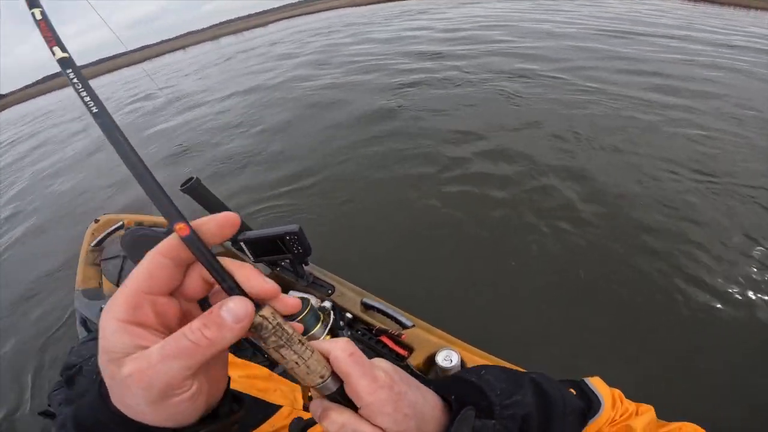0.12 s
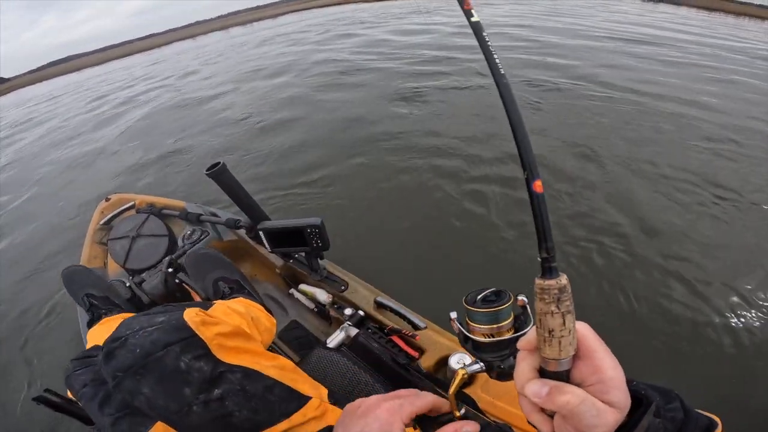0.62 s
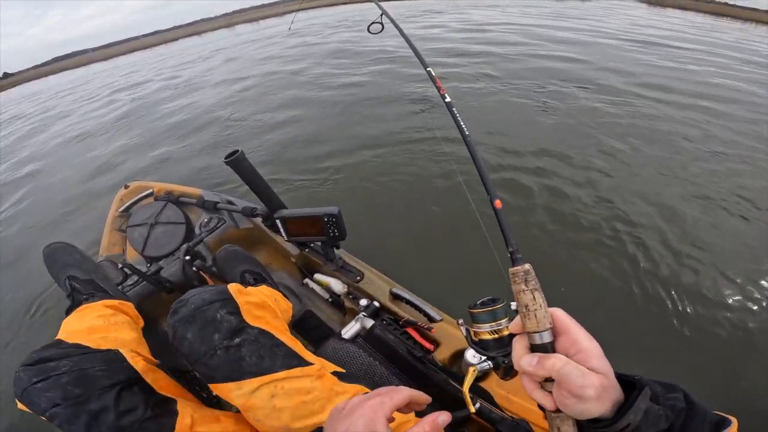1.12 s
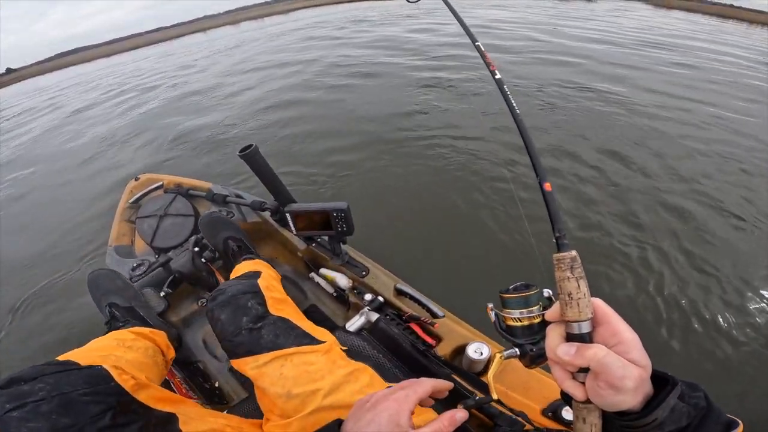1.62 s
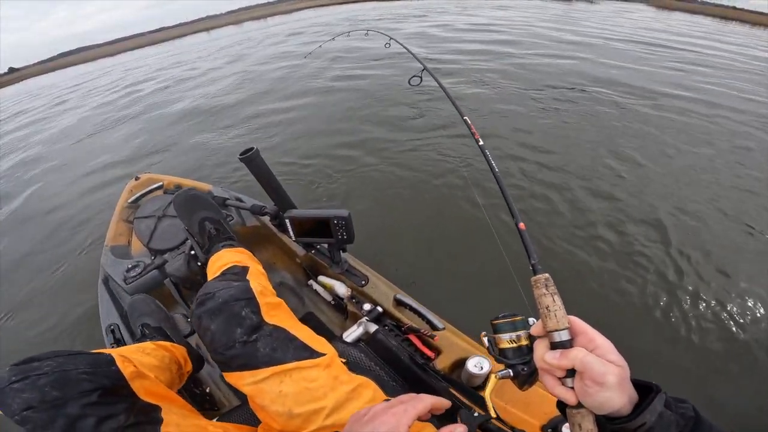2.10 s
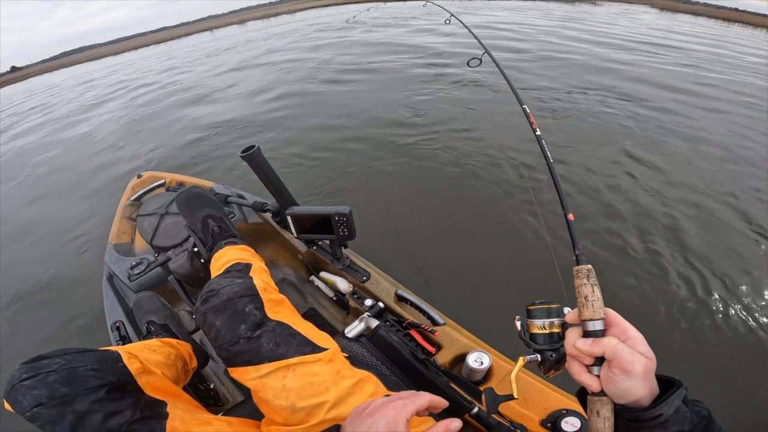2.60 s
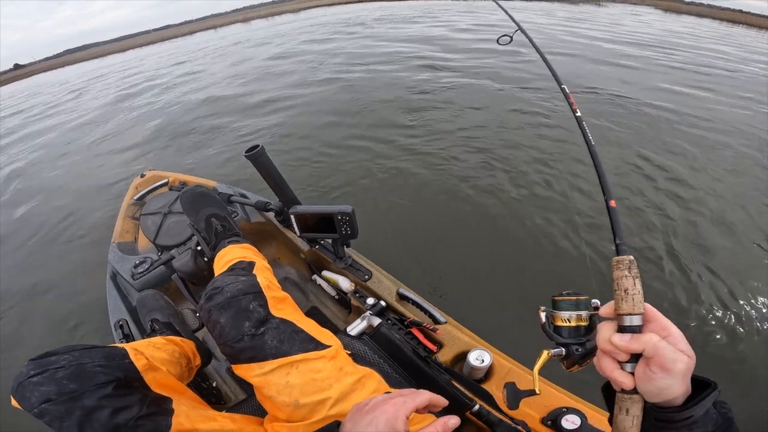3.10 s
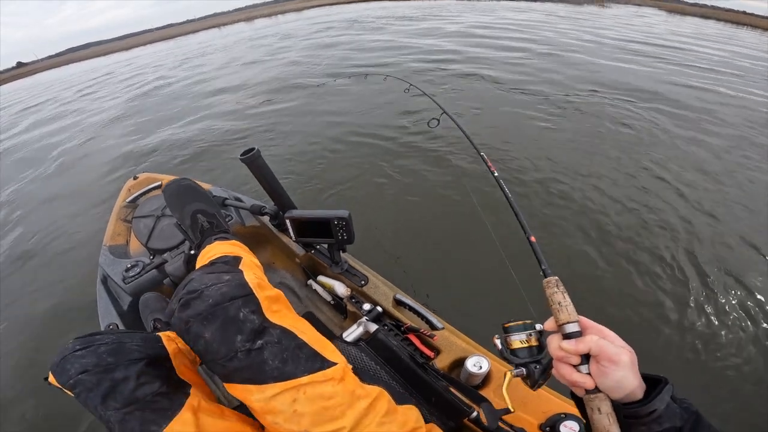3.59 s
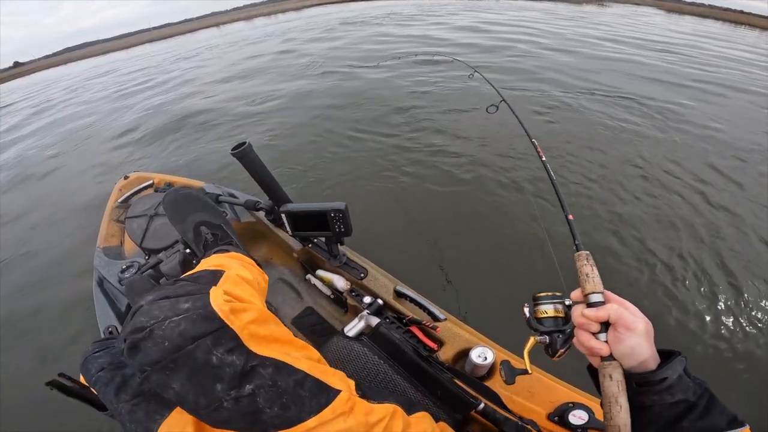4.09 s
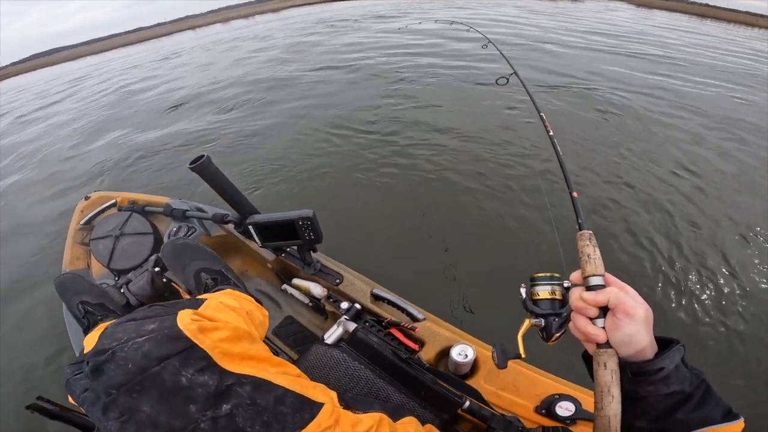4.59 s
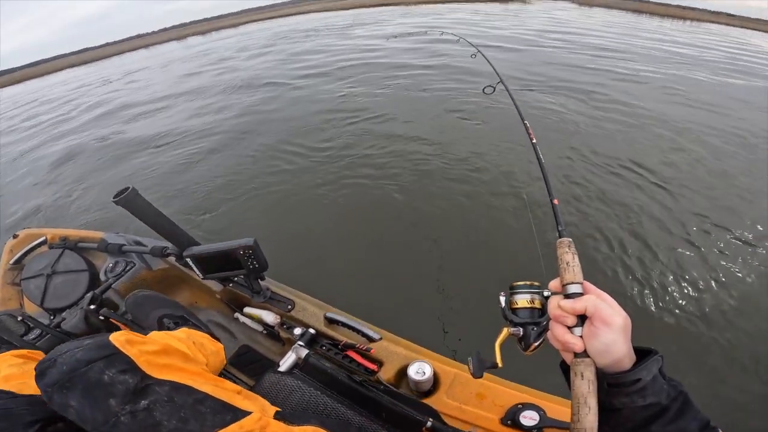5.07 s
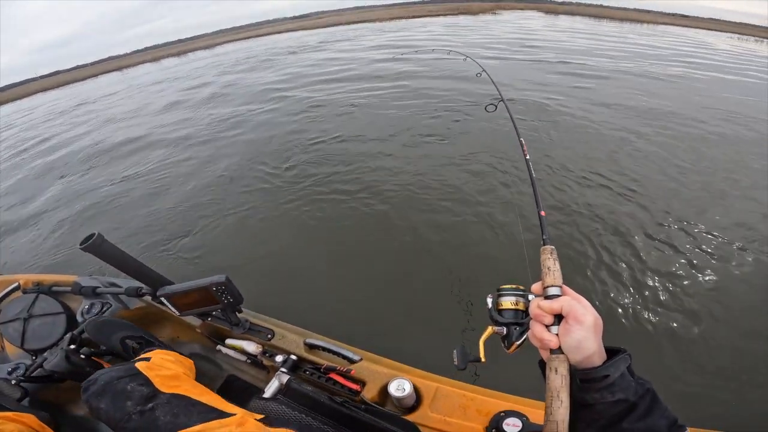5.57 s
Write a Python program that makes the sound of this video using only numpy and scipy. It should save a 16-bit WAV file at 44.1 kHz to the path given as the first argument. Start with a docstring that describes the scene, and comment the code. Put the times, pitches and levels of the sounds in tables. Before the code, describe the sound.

Open air on a kayak, heard from a body-worn microphone with no echo. Low, wavering wind rumble and dull handling bumps continue throughout. At 0-0.5 s, several quick knocks and sleeve scuffs accompany the first two sharp reel ticks. From 0.7 s the drag clicks about ten times a second, each a tiny bright metallic snap, easing near 1.5 s, while stiff cloth rustles and gear thuds on the hull. Around 1.85-2.2 s the ticks race at nearly thirty a second with faint line hiss, then slow and stop by 2.65 s. Cloth goes quiet near 3 s, then rustles again at 3.2 s. A second run of ticks, 3.4-4.2 s, peaks around 3.65 s and slows; one lone tick follows at 4.65 s amid a barely audible airy whine. Clustered knocks come at 4.8-5 s, a short falling rubbery squeak at 5.2 s, more rustling, and a strong thud at 5.65 s.

```python
"""In a kayak, on a body-worn camera: a spinning reel's drag clicks an arm's length away as a fish pulls line.
A spring pawl ticks on the spool, ringing body and rim; rod and gear knock the hull as damped tones.
A stiff suit scuffs, crumples and hisses, and wind rumbles on the microphone, all in shaped noise; bumps come
through the mount. Fast line hisses in the guides, a faint whine comes and goes, and late on one rub squeaks.
The two microphone ports share nearly everything and differ mostly in the treble."""
import sys
import numpy as np
from scipy import signal
from scipy.fft import rfft, irfft, next_fast_len
from scipy.io import wavfile
from scipy.ndimage import uniform_filter1d

SR = 44100
rng = np.random.default_rng(int(sys.argv[2]) if len(sys.argv) > 2 else 0)


def natural_amplitude(level_db):
    """Convert a level in decibels to a linear amplitude factor, elementwise."""
    exponent = np.asarray(level_db, float) / 20
    return 10 ** exponent


def pcm_store(signal):
    """Save signal as 16-bit PCM."""
    levels = np.round(np.clip(np.atleast_2d(signal), -1, 1) * 32767)
    wavfile.write(sys.argv[1], SR, levels.astype(np.int16).T)


N = 251092  # samples

# Levels in the tables are relative dB; later stages add to them.
# Wind on the microphone. Each row: frequency in Hz, density in dB.
WIND_SPECTRUM = [(12, -5), (22, 5.5), (55, -3.5), (100, -7), (140, -21), (250, -77)]
# Swells of the wind rumble, some only its random wavering.
# Each row: middle in seconds, length in seconds, peak in dB.
RUMBLE_SWELLS = [(0.06, .08, -30), (0.17, 0.37, -35.5), (0.3, 0.14, -23), (0.6, 0.16, -42),
                 (1.17, 0.35, -37), (1.31, 0.2, -35), (1.68, .1, -42), (2.55, 0.094, -41),
                 (2.7, 0.17, -38.5), (2.99, 0.22, -33.5), (3.15, 0.13, -39), (3.25, 0.049, -44),
                 (3.54, .16, -37.5), (3.78, .11, -28), (3.9, 0.2, -41), (4.25, 0.12, -39), (4.4, 0.21, -38),
                 (4.66, 0.061, -36), (4.91, 0.053, -45), (5.42, 0.33, -40), (5.68, 0.14, -30)]
# How hard the body works against the camera mount. Each row: time in seconds, bump level in dB.
STRAIN = [(0.0, -38.5), (0.3, -34.5), (0.45, -45), (0.84, -39), (1.15, -39), (1.45, -40.5), (1.8, -40.5),
          (2.1, -44.5), (2.42, -43.5), (2.55, -51), (3.2, -49), (3.35, -45.5), (4.1, -44.5), (4.75, -43.5),
          (5.1, -40.5), (5.45, -38), (5.69, -41.5)]
# Dull bumps through the mount. Each row: frequency in Hz, density in dB.
BUMP_SPECTRUM = [(70, -6), (120, -2), (200, -0.5), (300, -9), (450, -18), (800, -68)]
# Jolts through the mount. Each row: middle in seconds, length in seconds, peak in dB.
JOLTS = [(0.08, 0.096, -36.5), (2.68, 0.046, -55.5), (2.97, 0.088, -48), (3.5, 0.11, -55),
         (3.79, 0.068, -43.5), (4.17, 0.033, -34.5), (4.82, 0.083, -44), (4.94, 0.19, -30.5),
         (5.26, 0.12, -49), (5.65, 0.093, -43)]
# How briskly the suit moves. Each row: time in seconds, fabric hiss in dB.
RUSTLE = [(0.0, -61.5), (0.17, -59), (0.4, -56.5), (0.6, -65), (0.84, -60), (1.1, -57.5), (1.45, -56.5),
          (1.56, -62), (1.7, -71), (1.95, -62), (2.25, -67), (2.43, -67), (2.52, -82.5), (2.85, -87),
          (3.14, -81), (3.22, -58), (3.4, -57), (3.55, -58.5), (3.7, -59.5), (3.9, -61), (4.2, -62.5),
          (4.4, -66.5), (4.52, -74.5), (4.8, -68), (5.02, -63), (5.45, -60), (5.69, -57)]
# Single rubs of sleeve on suit. Each row: middle in seconds, length in seconds, scuff in dB, hiss in dB.
RUBS = [(0.083, 0.068, -37.5, -73), (0.361, 0.074, -46, -61), (0.479, 0.14, -44.5, -46),
        (1.306, 0.096, -54, -86), (1.562, 0.029, -50, -78), (2.4, 0.053, -50, -89),
        (3.246, 0.064, -54, -49), (3.58, 0.06, -54, -65), (3.89, 0.05, -57, -75),
        (4.162, 0.032, -45.5, -59), (4.33, .1, -67, -94), (4.835, 0.063, -47, -76),
        (4.933, 0.11, -42.5, -57.5), (5.33, 0.23, -48.5, -88)]
# Low scuffing of the suit. Each row: frequency in Hz, density in dB.
SCUFF_SPECTRUM = [(200, -20.5), (380, 0.5), (700, -6), (1100, -13), (1350, -16), (1600, -25), (2500, -61)]
# Fabric hiss close to the microphone. Each row: frequency in Hz, density in dB.
FABRIC_SPECTRUM = [(530, -20), (900, 0), (1220, -4), (1670, -7), (2550, -10), (3140, -9.5), (4100, -15),
                   (7080, -17.5), (8910, -33), (10800, -37.5), (12700, -25), (15200, -43), (16400, -37)]
# A sleeve dragging. Each row: frequency in Hz, density in dB.
DRAG_SPECTRUM = [(600, -23), (1200, -11), (2200, 1.5), (3500, 2), (4800, -9), (7200, -8), (9000, -24),
                 (10800, -32), (12500, -15), (15200, -36), (16400, -45)]
# Hiss that differs between the ports. Each row: frequency in Hz, density in dB.
SIDE_SPECTRUM = [(1000, -18), (4000, -22.5), (8000, -21), (10300, -56), (11200, -17), (12300, -4.5),
                 (13500, -22), (15200, -11), (16000, -45)]
# Microphone hiss. Each row: frequency in Hz, density in dB.
MIC_HISS_SPECTRUM = [(590, -25), (1000, 8), (1340, 6), (1950, 6), (3930, -5), (7380, 22), (8700, -109),
                     (11400, -127), (12300, -98), (16400, -35)]
# Rod and gear on the hull. Each row: start in seconds, thud in dB, pitch in Hz, hard edge in dB.
KNOCKS = [(0.015, -22.5, 390, -54), (0.06, -25, 1115, -48), (0.073, -33, 456, -46),
          (0.089, -27, 520, -49.5), (0.299, -22, 504, -59), (0.668, -21.5, 440, -59),
          (1.227, -20, 410, -52), (1.343, -24, 474, -66), (1.492, -25, 436, -60), (1.562, -27, 406, -60),
          (2.043, -36, 547, -43), (2.346, -27.5, 900, -60), (2.394, -44, 464, -45.5),
          (3.455, -19.5, 680, -57), (3.49, -28, 840, -58), (3.515, -27, 435, -57), (3.901, -27, 410, -63),
          (4.118, -23.5, 396, -65), (4.362, -24.5, 494, -64), (4.835, -23.5, 430, -52.5),
          (4.849, -31, 990, -57), (4.898, -19, 390, -52), (4.931, -35, 382, -47), (4.967, -16.5, 407, -60),
          (5.288, -20, 354, -60), (5.364, -28, 400, -60), (5.486, -26.5, 535, -58), (5.653, -11, 437, -43)]
# Pawl ticks. Each row: start in seconds (before TICK_LAG_S), strike in dB, spool shimmer in dB,
# shimmer across the ports in dB.
TICKS = [(0.138, -28.5, -37.5, -35), (0.348, -29.5, -45.5, -33), (0.7288, -27.5, -48, -36),
         (0.855, -30, -49, -34), (0.9442, -30.5, -47, -33), (1.0251, -32.5, -37.5, -29),
         (1.1, -37, -47, -26), (1.179, -35, -45, -31), (1.254, -31.5, -47, -34), (1.3486, -29, -59, -28),
         (1.46, -27.5, -66, -33), (1.6212, -27, -53.5, -33), (1.766, -30.5, -66, -40),
         (1.8303, -31, -54, -38), (1.878, -34.5, -43, -33), (1.9175, -41, -40.5, -29),
         (1.954, -33, -49, -33), (1.9872, -29.5, -41, -33), (2.0203, -28, -43, -28),
         (2.053, -26.5, -45, -29), (2.0875, -29.5, -44, -35), (2.1255, -27.5, -47, -35),
         (2.169, -28, -44, -38), (2.2238, -28, -45, -33), (2.3047, -28, -56, -33), (2.431, -30, -60, -39),
         (2.6521, -31, -64, -39), (3.375, -31.5, -60, -37), (3.5035, -28.5, -48, -33),
         (3.5775, -31, -53, -33), (3.6186, -31, -49, -39), (3.6546, -31.5, -45.5, -41),
         (3.6893, -35, -52, -35), (3.728, -36, -48, -33), (3.772, -32, -45, -38), (3.8193, -28, -60, -36),
         (3.8674, -31.5, -48, -32), (3.93, -27.5, -49, -33), (4.0237, -27.5, -52, -36),
         (4.168, -28, -49, -37), (4.648, -30.5, -48, -33)]
# Reel body under the pawl. Each row: nominal frequency in Hz, level in dB, 60 dB decay in seconds.
BODY_MODES = [(5050, -24, .004), (5560, -2, .007), (5920, -2, .007), (5720, -15, .02), (6500, -13, .006),
              (7200, -17, .006), (8400, -15, .007), (9750, -25, .006), (3410, -37, .18), (7575, -42, .28)]
# Thin spool rim. Each row: nominal frequency in Hz, level in dB, 60 dB decay in seconds.
RIM_MODES = [(11950, -5, .016), (12180, -2, .02), (12450, -8, .012), (14400, -2, .004), (15000, -7, .003)]
# What reaches the ports out of step. Each row: nominal frequency in Hz, level in dB, 60 dB decay in seconds.
PORT_MODES = [(12270, 9, 0.0063), (12300, -8, 0.011), (13400, -18, .006), (14800, -4, 0.0043),
              (15400, -18, .004)]
# Line hissing through the guides during fast runs. Each row: middle in seconds, length in seconds,
# peak in dB, centre in Hz, width of each filter pass in Hz.
LINE_RUNS = [(1.96, 0.57, -65, 8000, 1200), (2.05, 0.63, -75.5, 10500, 900), (3.71, 0.53, -69, 9800, 840)]
# A faint airy whine. Each row: middle in seconds, length in seconds, peak in dB.
WHINE_RUNS = [(2.38, 0.62, -65), (4.63, 0.54, -62.5)]
# A short rubbing squeak. Each row: time in seconds, nominal pitch in Hz, level in dB,
# overtones over the fundamental in dB.
SQUEAK = [(5.135, 1400, -70, -30), (5.15, 1405, -50, -30), (5.195, 1378, -43, -20), (5.21, 1346, -42, -8),
          (5.227, 1290, -45, -7), (5.24, 1130, -54, 4), (5.256, 1085, -46, -14), (5.275, 1050, -70, -20)]

# Middle settings of rustle and strain [dB]; the levels below move by so many dB per dB away from them
MID_RUSTLE_DB, MID_STRAIN_DB = -62, -43
WIND_DB, WIND_PER_STRAIN = -40, 0.088
SCUFF_DB, SCUFF_PER_RUSTLE, SCUFF_PER_STRAIN = -52.5, 0.35, 0.15
CRUMPLE_DB, CRUMPLE_PER_RUSTLE = -57.5, 1
# Folds of stiff cloth popping over: pops a second, pitch range [Hz], twice the cycles to the peak, size spread
# [dB]
CRUMPLE_PER_S, CRUMPLE_LOW_HZ, CRUMPLE_HIGH_HZ, CRUMPLE_CYCLES = 260, 450, 1700, 2.2
CRUMPLE_SPREAD_DB = 3
FABRIC_SIDE_DB = -25  # side against mid
KNOCK_T60_S, CRACK_S = 0.014, .0045  # thud's 60 dB decay, crack's time constant
TICK_LAG_S = .0008  # fixed delay added to every tick start
BODY_RISE_S, SNAP_S = .0011, .0012  # build-up of the body ring, time constant of the snap
TOP_HZ = 15300  # treble limit of the camera


def curve(table):
    """Columns of a table joined by straight lines in time."""
    s, *columns = np.transpose(table)
    return [np.interp(np.arange(N) / SR, s, c) for c in columns]


def colour(x, spectrum):
    """Shape a signal by (Hz, dB) points joined over log frequency; rms 1."""
    hz, db = np.transpose(spectrum)
    size = next_fast_len(N)
    f = np.maximum(np.arange(size // 2 + 1) * SR / size, 1)
    gain = natural_amplitude(np.interp(np.log(f), np.log(hz), db))
    y = irfft(rfft(x, size) * gain, size)[:N]
    return y / np.std(y)


def walk(rate):
    """Random levels held 1 / rate s and slewed twice."""
    k = int(SR / rate)
    held = np.repeat(rng.standard_normal(N // k + 1), k)
    return uniform_filter1d(uniform_filter1d(held, k), k)[:N]


def grainy(rate, spread_db, share):
    """Noise mixed with scattered clicks of unequal size, about rate a second."""
    present = rng.random(N) < rate / SR
    sizes = natural_amplitude(spread_db * rng.standard_normal(N))
    clicks = present * rng.choice([-1, 1], N) * sizes
    return rng.standard_normal(N) + share * clicks / np.std(clicks)


def swells(events):
    """Gain of (middle, length, peak dB) events, each a squared-cosine rise and fall."""
    t = np.arange(N) / SR
    return sum(natural_amplitude(db) * np.cos(np.pi * np.clip((t - s) / length, -.5, .5)) ** 2 for s, length, db in events)


def add(out, s, x):
    """Mix a sound in at a time."""
    i = int(s * SR)
    out[i:i + len(x)] += x[:N - i]


def wind(tense):
    """Low wind rumble on the microphone, wavering and rising a little with strain, plus placed swells."""
    blow = natural_amplitude(WIND_DB + WIND_PER_STRAIN * tense + 2.2 * walk(9)) + swells(RUMBLE_SWELLS)
    return blow * colour(rng.standard_normal(N), WIND_SPECTRUM)


def mount_bumps(strain_db):
    """Dull grainy noise carried through the mount as the body strains, with single jolts."""
    push = (natural_amplitude(strain_db) + swells(JOLTS)) * natural_amplitude(0.78 * walk(25))
    return push * colour(grainy(60, 4.8, 0.54), BUMP_SPECTRUM)


def crumple():
    """Stiff folds popping over: scattered bursts of a few cycles, each with its own pitch and size; rms 1."""
    out, t = np.zeros(N), np.arange(SR // 50) / SR
    for when, pitch, size in rng.random((int(CRUMPLE_PER_S * N / SR), 3)):
        hz = CRUMPLE_LOW_HZ * (CRUMPLE_HIGH_HZ / CRUMPLE_LOW_HZ) ** pitch
        turn = t * hz / CRUMPLE_CYCLES
        gain = natural_amplitude(-CRUMPLE_SPREAD_DB * np.log(1 - size))
        add(out, when * N / SR, gain * turn * np.exp(-2 * turn) * np.sin(2 * np.pi * hz * t))
    return out / np.std(out)


def suit_scuff(brisk, tense):
    """Cloth rubbing on cloth: low grainy noise, with the crumpling of its folds."""
    rub = natural_amplitude(SCUFF_DB + SCUFF_PER_RUSTLE * brisk + SCUFF_PER_STRAIN * tense)
    rub = rub + swells((s, length, db) for s, length, db, _ in RUBS)
    scuff = rub * natural_amplitude(2.0 * walk(40)) * colour(grainy(250, 5.4, 0.7), SCUFF_SPECTRUM)
    fold_gain = natural_amplitude(CRUMPLE_DB + CRUMPLE_PER_RUSTLE * brisk + 4.9 * walk(9.2))
    return scuff + fold_gain * crumple()


def suit_hiss(rustle_db):
    """Fine friction of the fabric and dragging sleeve, as grainy treble noise. Gives mid, side."""
    hiss = natural_amplitude(rustle_db + 6.0 + 2.65 * walk(13))
    drag = swells((s, length, db) for s, length, _, db in RUBS)
    mid = hiss * colour(grainy(700, 5.2, 0.59), FABRIC_SPECTRUM)
    mid = mid + drag * colour(grainy(700, 3.4, 0.6), DRAG_SPECTRUM)
    side = (hiss + drag) * natural_amplitude(FABRIC_SIDE_DB) * colour(rng.standard_normal(N), SIDE_SPECTRUM)
    return mid, side


def microphone_hiss():
    """Steady shaped noise of the microphone. Gives mid, side."""
    mid = natural_amplitude(-87) * colour(rng.standard_normal(N), MIC_HISS_SPECTRUM)
    return mid, natural_amplitude(-94) * colour(rng.standard_normal(N), SIDE_SPECTRUM)


def knocks():
    """Gear on the hull: a fast-damped sine thud with a band-limited noise crack at contact."""
    out, t = np.zeros(N), np.arange(SR // 10) / SR
    cracks = rng.standard_normal((len(KNOCKS), len(t)))
    edge = signal.butter(4, [800, 3800], "band", fs=SR, output="sos")
    envelope = np.exp(-np.log(1000) * t / KNOCK_T60_S) * (1 - np.exp(-t / 0.00097))
    for (s, db, hz, edge_db), noise in zip(KNOCKS, cracks):
        thud = np.sin(2 * np.pi * hz * t) * envelope
        crack = signal.sosfilt(edge, noise * np.exp(-t / CRACK_S))
        add(out, s, 1.07 * natural_amplitude(db) * thud + natural_amplitude(edge_db + 14.0) * crack)
    return out


def ring(modes, chance, rise, detune=.012, scatter_db=3.5):
    """One blow on decaying modes, each a little different every time; the contact takes a moment to build."""
    hz, db, t60 = np.transpose(modes)[:, :, None]
    t = np.arange(SR // 3) / SR
    # modes that ring longer than 15 ms stray less in pitch
    stray = 1 + detune * np.minimum(0.015 / t60, 1) * chance[0]
    wave = np.sin(2 * np.pi * hz * stray * t)
    rings = natural_amplitude(db + scatter_db * chance[1]) * wave * np.exp(-np.log(1000) * t / t60)
    return rings.sum(axis=0) * np.sin(np.pi / 2 * np.minimum(t / rise, 1)) ** 2


def reel():
    """Each tick snaps, rings body and rim, and has a short noise tail, fainter in the side. Gives mid, side."""
    mid, side = np.zeros(N), np.zeros(N)
    t = np.arange(SR // 20) / SR
    chance = rng.standard_normal((len(TICKS), 3, 2, len(BODY_MODES), 1))
    bright = signal.lfilter([1, -.6], 1, rng.standard_normal((len(TICKS), len(t))))
    snaps = bright * np.exp(-t / SNAP_S) * np.minimum(t / 0.00021, 1)
    for (s, strike_db, rim_db, port_db), (a, b, c), snap in zip(TICKS, chance, snaps):
        s = s + TICK_LAG_S
        body = ring(BODY_MODES, a, BODY_RISE_S) + natural_amplitude(-12.5) * np.pad(snap, (0, SR // 3 - len(t)))
        rim = ring(RIM_MODES, b[:, :len(RIM_MODES)], 0.0022)
        add(mid, s, natural_amplitude(strike_db) * body + natural_amplitude(rim_db + 5.5) * rim)
        add(side, s, natural_amplitude(port_db) * ring(PORT_MODES, c[:, :len(PORT_MODES)], 0.0013))
    # the tail is the tick smeared by decaying noise that starts after 3 ms
    smears = rng.standard_normal((2, len(t))) * np.exp(-t / 0.0053) * (t > .003)
    mid_tail, side_tail = (signal.fftconvolve(mid, smear)[:N] for smear in smears)
    return mid + natural_amplitude(-28) * mid_tail, side + natural_amplitude(-36.5) * side_tail


def airy(runs, hz, width_hz, flicker_db):
    """A narrow, flickering hiss from twice-resonated noise that lasts only for the given runs."""
    b, a = signal.iirpeak(hz, hz / width_hz, SR)
    hiss = signal.lfilter(b, a, signal.lfilter(b, a, rng.standard_normal(N)))
    return swells(runs) * natural_amplitude(flicker_db * walk(30.07)) * hiss / np.std(hiss)


def line_hiss():
    """Line rushing through the guides: narrow treble hiss, placed by run."""
    return sum(airy([run], hz, width_hz, 3) for *run, hz, width_hz in LINE_RUNS)


def whine():
    """A faint airy whine: noise through a narrow resonance at 1320 Hz."""
    return airy(WHINE_RUNS, 1320, 200, 1.5)


def squeak():
    """Stick-slip of a rubbery surface: a rough falling tone that grows overtones."""
    hz, db, over_db = curve(SQUEAK)
    phase = 2 * np.pi * np.cumsum(hz * (1 + 0.024 * walk(300))) / SR
    t = np.arange(N) / SR
    on = (t > SQUEAK[0][0]) & (t < SQUEAK[-1][0])
    over = natural_amplitude(over_db)
    grip = natural_amplitude(4 * walk(150))
    tone = np.sin(phase) + over * np.sin(2 * phase) + 0.38 * over ** 3 * np.sin(3 * phase)
    return on * grip * natural_amplitude(db) * tone


def scene():
    """Every source sits in the middle; reel, suit and microphone hiss also differ between the two ports."""
    (rustle_db,), (strain_db,) = curve(RUSTLE), curve(STRAIN)
    brisk, tense = rustle_db - MID_RUSTLE_DB, strain_db - MID_STRAIN_DB
    cloth, cloth_side = suit_hiss(rustle_db)
    hiss, hiss_side = microphone_hiss()
    tick, tick_side = reel()
    mid = wind(tense) + mount_bumps(strain_db) + suit_scuff(brisk, tense) + cloth + hiss
    mid = mid + knocks() + tick + line_hiss() + whine() + squeak()
    side = cloth_side + hiss_side + tick_side
    return np.array([mid + side, mid - side])


def top_cut(x):
    """Nothing passes above the cut-off."""
    return signal.sosfilt(signal.butter(12, 16500, fs=SR, output="sos"), x)


def record(dry):
    """The camera cuts the extreme top with a steep low-pass."""
    low_pass = signal.cheby1(8, .5, TOP_HZ, fs=SR, output="sos")
    mix = signal.sosfilt(low_pass, dry)
    return top_cut(mix)


dry = scene()
out = record(dry)
pcm_store(out)
```